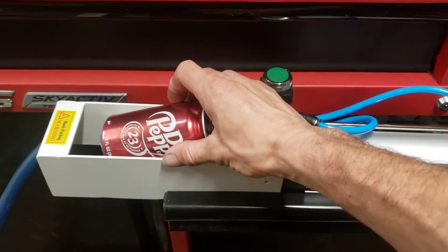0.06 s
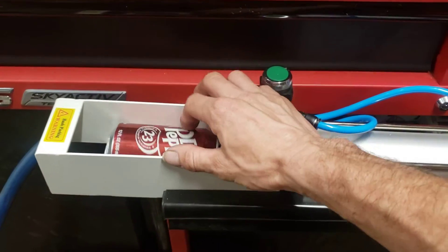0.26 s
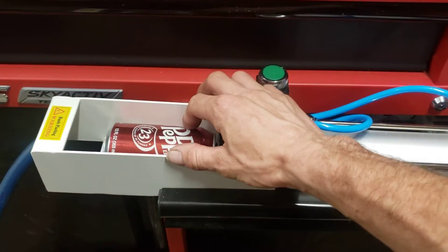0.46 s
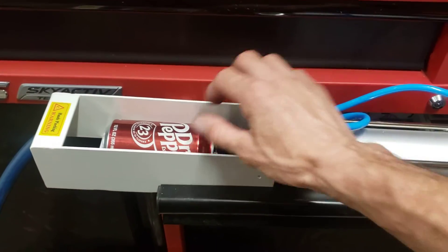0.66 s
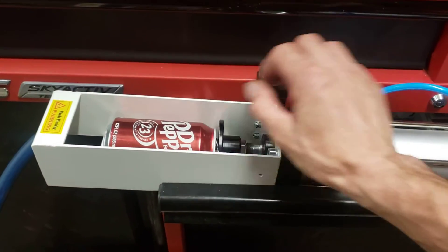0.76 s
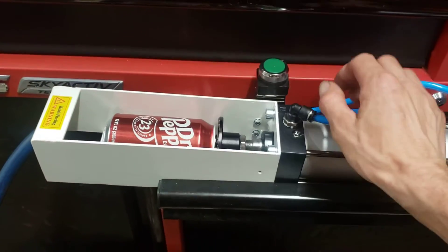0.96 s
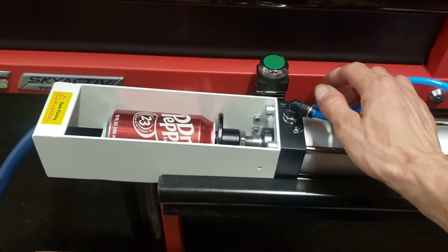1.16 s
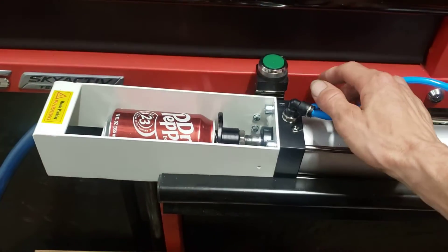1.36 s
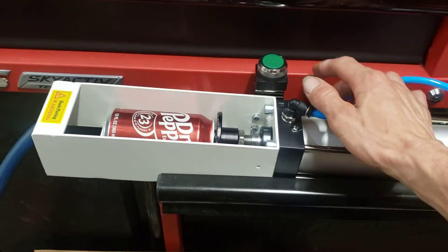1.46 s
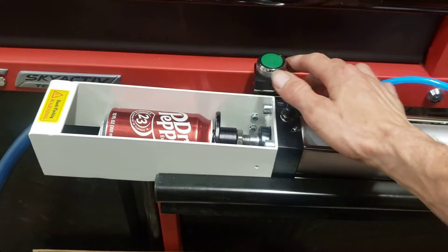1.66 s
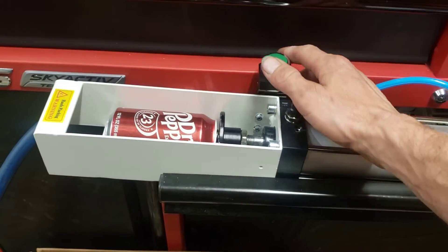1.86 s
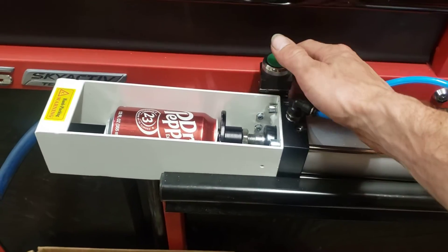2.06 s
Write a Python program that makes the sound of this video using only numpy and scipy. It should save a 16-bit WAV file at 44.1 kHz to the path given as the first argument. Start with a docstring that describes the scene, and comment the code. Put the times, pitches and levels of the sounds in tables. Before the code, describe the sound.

A full drink can is set down in a metal trough, knocking and clattering.

```python
"""Drink can in a metal trough

A quiet workshop, close up on a stereo microphone pair. A full can, damped by the hand, bumps the rim of
a sheet-metal trough, touches down and scrapes along the wall in tiny slips. It lands on one end and then
the other, ringing both can and sheet, squeaks and settles. Behind the room's short reverberation a
machine hums low, beating against a slightly slower motor."""
import sys
import numpy as np
from scipy import signal
from scipy.fft import rfft, irfft
from scipy.io import wavfile
from scipy.ndimage import uniform_filter1d

SR = 44100
rng = np.random.default_rng(int(sys.argv[2]) if len(sys.argv) > 2 else 0)


def file_out(sig):
    """Save sig as 16-bit WAV at sys.argv[1]."""
    # one column per channel
    cols = np.atleast_2d(sig).T
    # limit, then scale
    lim = np.clip(cols, -1, 1)
    pcm = np.round(lim * 32767).astype(np.int16)
    wavfile.write(sys.argv[1], SR, pcm)


N = 92610
T = np.arange(SR * 3 // 4) / SR  # time axis of one event
HZ = np.fft.rfftfreq(4096, 1 / SR)  # frequency axis of the tone curves
BASS, TREBLE = 1 / (1 + (HZ / 513) ** 4), 1 - 1 / (1 + (HZ / 3514) ** 3)  # shelves, 0-1
MONO_HZ = 1000  # below this, both microphones hear nearly the same

# Blows in the trough: t/s, clack level/dB, bass/dB, treble/dB, can ring/dB, trough ring/dB, crack decay/s
BLOWS = [(0.2063, -1.5, 4.5, 8.5, -54, -53.5, .0012), (0.2643, 10, -10, -7.5, -44, -50.5, .0004),
         (.2679, 23, -16.5, -2, -19, -38, .0006), (.2703, 14, -17, 5, -40, -45, .001),
         (.2775, 9.5, -17, -6, -37.5, -51, .0003), (0.291, 17, -14.5, -11, -42.5, -46, .0004),
         (0.3227, 24.5, -3.5, -4, -41.5, -22.5, 0.00031), (0.3327, 18.5, -3, -2, -44, -34.5, .0008),
         (0.3586, 5.5, -1, -1.5, -33, -36.5, 0.0061), (.4105, 12, -33.5, -25, -50, -54.5, 0.00047)]
# Tone of can against sheet: f/Hz, gain/dB
CLACK_TONE = [(45, -58), (110, -27.5), (175, -34.5), (330, -2), (500, -9), (780, 3.5), (1000, -3),
              (2100, -2.5), (2700, -14.5), (3500, -8), (5300, -21.5), (6700, -16), (8500, -19.5),
              (15500, -13.5)]
# Modes of the can, the trough, the first touch and the trough's floor: f/Hz, relative level/dB, t60/s
CAN_MODES = [(735, -4, .13), (1121, -1, .15), (1437, 1, .17), (1712, -5, .14), (2099, -3, .2),
             (3138, -13, .2)]
TROUGH_MODES = [(231, -13, .45), (312, -5, .09), (355, -6, .12), (722, -3, .15), (800, -1, .13),
                (826, -4, .19), (1197, -5, .19), (1512, -7, .21), (1615, -8, .26), (1757, -9, .21),
                (2130, -7, .26), (2443, -9, .15), (3484, -4, .14)]
FIRST_TOUCH_MODES = [(355, -6, .2), (800, -6, .12), (1310, -1, .07), (1716, 0, .18), (3220, -2, .06)]
THUD_MODES = [(105, -14, .09), (260, -10, .08), (322, 0, .08), (812, 1, .07)]
def blows():
    """Close up, each blow clacks and sets both the can and the trough ringing."""
    out = np.zeros((2, N))
    for at, db, bass_db, treble_db, can_db, trough_db, crack_s in BLOWS:
        tone = curve(CLACK_TONE, HZ) + bass_db * BASS + treble_db * TREBLE
        clack = amp(db) * strike(tone + wall_ripple(), crack_s)
        add(out, at, clack + amp(can_db) * ring(CAN_MODES) + amp(trough_db) * ring(TROUGH_MODES))
    add(out, .2068, amp(-30) * ring(FIRST_TOUCH_MODES))  # the first touch also rings a separate set of modes
    rise = 1 - np.exp(-T / .003)
    add(out, .3231, amp(-13) * ring(THUD_MODES) * rise)  # the full weight lands on the trough floor
    return out


# Dense ring of the sheet metal: f/Hz, t60/s
SHIVER_T60 = [(150, 0.075), (800, 0.04), (2000, 0.14), (5000, 0.091), (15000, 0.031)]
def strike(tone_db, crack_s=.00043):
    """One contact: a sharp push, a crack while it chatters, then the sheet's shiver and overtones."""
    push = amp(-6) * signal.unit_impulse(len(T))
    crack = amp(-2.5) * diffuse(len(T)) * np.exp(-T / crack_s) / np.sqrt(crack_s * SR / 2)
    overtones = np.zeros((2, len(T)))
    t = T[:4096]
    for height, size, left, right in rng.random((60, 4)):
        hz = 2400 * 6.5 ** height
        phase = 2 * np.pi * (hz * t + np.array([[left], [right]]))
        add(overtones, 0, size * decay(t, t60=.1) * np.sin(phase))
    return colour(push + crack + tail(SHIVER_T60) + amp(-37) * overtones, tone_db)


def wall_ripple(spacing_hz=260):
    """Peaks and notches in dB that depend on where the thin wall is touched; deepest in the treble."""
    knots = np.arange(0, SR, spacing_hz)
    ripple_db = 4 * np.interp(HZ, knots, rng.uniform(-3.2, 1.6, len(knots)))
    return ripple_db / (1 + (2500 / (HZ + 1)) ** 2)


# Dull bumps on the rim: t/s, level/dB, treble/dB
BUMPS = [(0.0776, 2.5, -4), (0.1086, -4.5, -10), (0.1185, 3, -11)]
# Tone of the hand-held can: f/Hz, gain/dB
BUMP_TONE = [(100, -23.5), (400, -17), (700, -2.5), (1050, -1.5), (1500, -8), (2400, -14), (4000, -44),
             (6800, -27.5), (14000, -31)]
def rim_bumps():
    """At the rim the hand damps the can, so it gives only short hollow notes and a light brush."""
    out = np.zeros((2, N))
    note_hz, note_db, note_t60 = 973.7, -28, .014
    for at, db, treble_db in BUMPS:
        note = ring([(note_hz, note_db, note_t60)])
        knock = strike(curve(BUMP_TONE, HZ) + treble_db * TREBLE)
        add(out, at, amp(db) * (note + knock))
    add(out, .113, rub(length_s=.02, db=-59, modes=[]))  # the brush
    return out


# Course of the slide: t/s, relative level/dB
SCRAPE_LEVEL = [(.21, -28.5), (.234, -13.5), (.246, -18.5), (.255, -13.5), (.267, -23.5)]
# Tone of the scraped wall: f/Hz, gain/dB
SCRAPE_TONE = [(60, -31), (350, -4), (1700, -2), (3700, -4.5), (5300, -17), (6200, -3), (7800, -11),
               (12200, -1), (15500, -5.5)]
def scrape(slips_per_s=1100):
    """The can slides down the wall in a dense train of tiny slips, each briefly shaking the sheet."""
    slips = unit(rng.standard_normal(N) * (rng.random(N) < slips_per_s / SR))
    slide_db = np.interp(np.arange(N) / SR, *np.transpose(SCRAPE_LEVEL), left=-np.inf, right=-np.inf)
    slips *= amp(slide_db - 12.5)
    wall = diffuse(len(T)) * np.exp(-T / .0041)
    wall /= np.linalg.norm(wall[0])
    rasp = signal.fftconvolve(slips[None], wall, axes=1)[:, :N]
    return colour(rasp, curve(SCRAPE_TONE, HZ) + wall_ripple())


# Catches during the slide: t/s, level/dB, treble/dB
CATCHES = [(.2238, -1, -5), (0.2311, -5.5, 6.5), (0.2375, -8, 10), (0.25, -7, 11)]
def catches():
    """The sliding can catches on the wall in a few separate ticks."""
    out = np.zeros((2, N))
    for at, db, treble_db in CATCHES:
        tone = curve(CLACK_TONE, HZ) + treble_db * TREBLE
        add(out, at, amp(db) * strike(tone + wall_ripple(), crack_s=.0017))
    return out


# Squeaks of metal on metal: t/s, length/s, level/dB
SQUEAKS = [(.3562, .005, -18), (.3638, .004, -19)]
# Modes of a squeak and of the last tick: f/Hz, relative level/dB, t60/s
SQUEAK_MODES = [(15480, 0, .035), (6900, -19, .08), (2121, -11, .12)]
TICK_MODES = [(2830, -9, .03), (4790, -5, .025), (4950, -8, .02), (7300, -10, .02), (15430, -3, .02)]
def settling():
    """The can squeaks into place left of centre, then ticks slightly right as the fingers let go."""
    out = np.zeros((2, N))
    for at, length_s, db in SQUEAKS:
        add(out, at, rub(length_s, db, SQUEAK_MODES, hiss_db=-10) * amp([[2], [-3]]))
    add(out, .488, rub(length_s=.006, db=-40, modes=TICK_MODES) * amp([[-1], [1]]))
    return out


# Hiss of rubbing metal: f/Hz, gain/dB
RUB_TONE = [(300, -33), (5000, -6), (9000, -3.5), (13000, 13)]
def rub(length_s, db, modes, hiss_db=0):
    """A brief rub hisses and pumps up unsteady modes, then lets them die."""
    pressure = np.sin(np.pi * np.minimum(T / length_s, 1))
    out = colour(pressure * diffuse(len(T)), hiss_db + curve(RUB_TONE, HZ))
    for hz, mode_db, t60 in modes:
        swell = signal.lfilter([1], [1, -decay(1 / SR, t60)], pressure)
        wander = .006 * unit(uniform_filter1d(rng.standard_normal(len(T)), size=60))
        cycles = np.cumsum(hz * (1 + wander)) / SR + rng.random((2, 1))
        out += amp(mode_db) * swell / swell.max() * np.sin(2 * np.pi * cycles)
    return amp(db) * out


# Decay of the workshop: f/Hz, t60/s
ROOM_T60 = [(100, .25), (1000, .28), (2500, .32), (6000, .37), (12500, .37), (15500, .24)]
# Tone of its reverberation: f/Hz, gain/dB
ROOM_TONE = [(100, -10), (500, -5.5), (1500, -15.5), (6000, -10), (15000, -13)]
def workshop_reverb(direct, delay_s=.0064):
    """The room's reflections reach the microphones just after the direct sound."""
    out = np.zeros((2, N))
    reflections = signal.fftconvolve(direct, tail(ROOM_T60), axes=1)[:, :N]
    add(out, delay_s, colour(reflections, curve(ROOM_TONE, HZ)))
    return out


# Lines of the hum: harmonic number, level/dB, slower motor's relative amplitude
HUM_LINES = [(1, -55.5, .75), (2, -51, .3), (4, -60.3, .3)]
def machine_hum(hum_hz=59.3, beat_hz=2.38, dip_at_s=.522, waver_db=.8):
    """Farther back in the workshop a machine hums, and a slightly slower motor beats against it."""
    t, hum = np.arange(N) / SR, 0
    beat = np.exp(-2j * np.pi * beat_hz * (t - dip_at_s))
    for harmonic, db, share in HUM_LINES:
        waver = unit(sum(np.sin(2 * np.pi * (hz * t + rng.random())) for hz in np.geomspace(1, 6, 8)))
        line = np.exp(2j * np.pi * (harmonic * hum_hz * t + rng.random())) * (1 - share * beat)
        hum += np.sqrt(2) * amp(db + waver_db * waver) * line.real
    return hum * amp([[.5], [-.5]])


# Spectrum of the quiet workshop: f/Hz, relative level/dB
AIR_TONE = [(25, -18), (100, 4), (260, -6), (400, -13.5), (700, -25.5), (1100, -33.5), (1600, -31),
            (2300, -37.5), (9000, -45.5), (10800, -39.5), (12200, -27.5), (15500, -35.5)]
def room_air():
    """Faint rumble and hiss all around the microphones."""
    return amp(-60.5) * unit(colour(diffuse(N), curve(AIR_TONE, HZ)))


def ring(modes):
    """Dying sines; the higher ones reach the two microphones out of step."""
    out = 0
    for (hz, db, t60), side in zip(modes, rng.uniform(-1.2, 1, len(modes))):
        lag = np.sign(side) * np.pi / 16 / (1 + (MONO_HZ / hz) ** 4) * np.array([[1], [-1]])
        out += amp(db) * decay(T, t60) * np.sin(2 * np.pi * hz * T + lag)
    return out


def tail(t60s):
    """Dense ring in which each band has the same energy density and dies at its own speed."""
    noise, hz, out = rfft(diffuse(len(T))), np.fft.rfftfreq(len(T), 1 / SR), 0
    centres, times = np.transpose(t60s)
    for t60, weights in zip(times, np.eye(len(t60s))):
        band = irfft(noise * curve(np.c_[centres, weights], hz), len(T))
        fade = decay(T, t60)
        out += band * fade / np.linalg.norm(fade)
    return out


def diffuse(size, bass_spread_rad=.14):
    """Stereo noise, alike on both sides in the bass and unrelated in the treble."""
    mid, side = rfft(rng.standard_normal((2, size)))
    hz = np.fft.rfftfreq(size, 1 / SR)
    spread = bass_spread_rad + (np.pi / 4 - bass_spread_rad) / (1 + (MONO_HZ / (hz + 1)) ** 4)
    mid, side = mid * np.cos(spread), side * np.sin(spread)
    return irfft(np.array([mid + side, mid - side]), size)


def colour(x, db):
    """Minimum-phase filter with the gain db over HZ."""
    log_gain = np.log(amp(np.r_[db, db[-2:0:-1]]))
    taps = np.fft.ifft(np.exp(np.conj(signal.hilbert(log_gain)))).real
    return signal.fftconvolve(x, taps[None], axes=1)[:, :x.shape[1]]


def curve(points, hz):
    """Reads a table on a log-frequency axis."""
    f, value = np.transpose(points)
    return np.interp(np.log(hz + 1), np.log(f + 1), value)


def decay(t, t60):
    """Falls by 60 dB in t60 seconds."""
    return amp(-60 * t / t60)


def amp(db):
    """Decibels to gain."""
    return 10 ** (np.asarray(db) / 20)


def unit(x):
    """Scales to rms 1."""
    return x / np.sqrt(np.mean(x ** 2) + 1e-20)


def add(mix, at_s, sound):
    """Mixes a stereo sound in at a given time."""
    part = mix[:, round(at_s * SR):][:, :sound.shape[1]]
    part += sound[:, :part.shape[1]]


def scene():
    """Can and trough in front, the workshop and its hum behind."""
    can = rim_bumps() + blows() + scrape() + catches() + settling()
    return can + workshop_reverb(can) + machine_hum() + room_air()


def record(dry):
    """Microphone chain: bass roll-off, soft overload on the peaks, then the band limit."""
    low_cut_hz, ceiling, top_hz = 38, .95, 15900
    trimmed = signal.sosfilt(signal.butter(2, low_cut_hz, "high", fs=SR, output="sos"), dry)
    saturated = ceiling * np.tanh(trimmed / ceiling)
    low_pass = signal.firwin(255, top_hz, window=("kaiser", 7), fs=SR)
    return signal.oaconvolve(saturated, low_pass[None], "same")


dry = scene()
out = record(dry)
file_out(out)
```